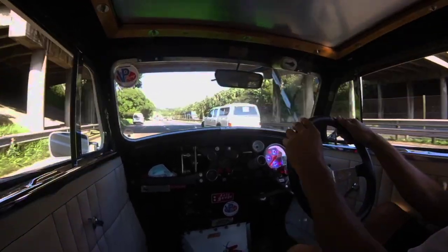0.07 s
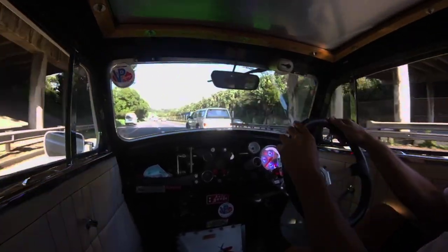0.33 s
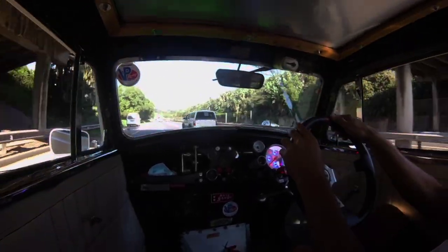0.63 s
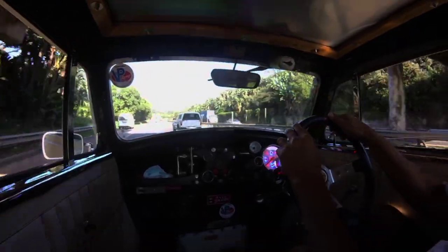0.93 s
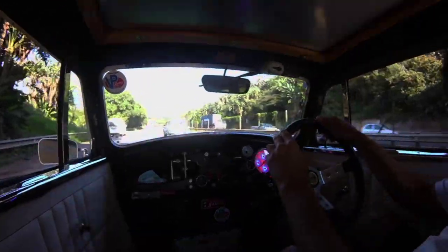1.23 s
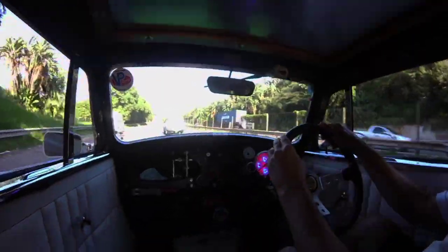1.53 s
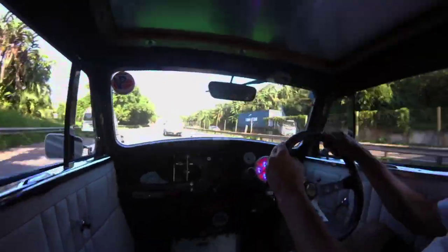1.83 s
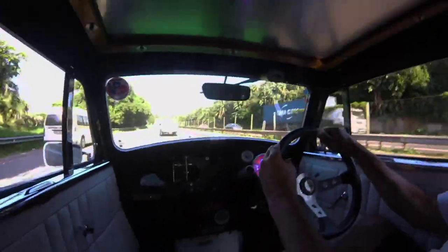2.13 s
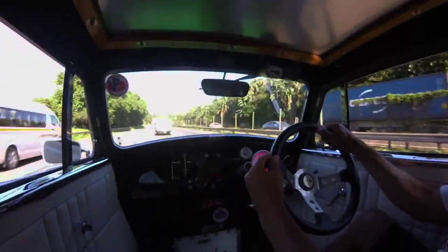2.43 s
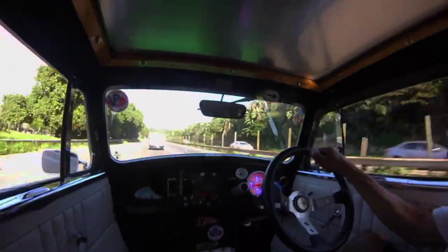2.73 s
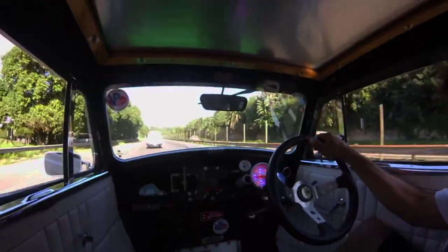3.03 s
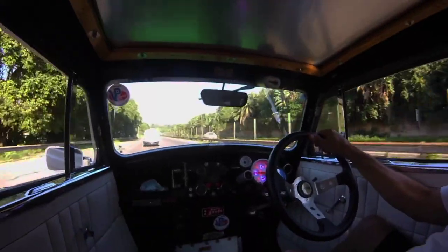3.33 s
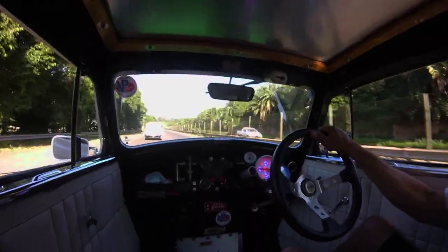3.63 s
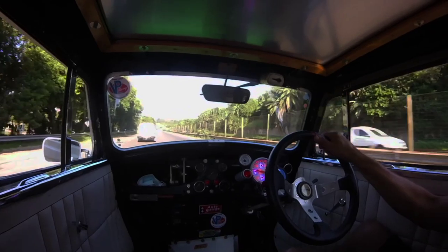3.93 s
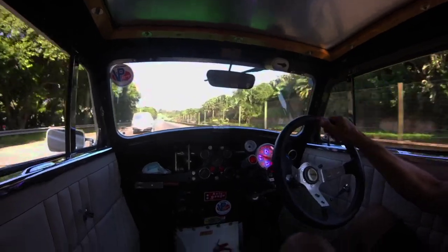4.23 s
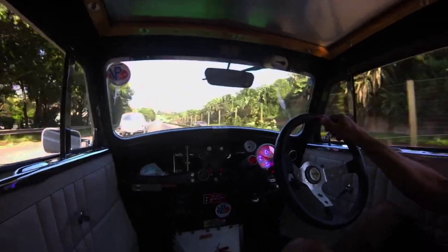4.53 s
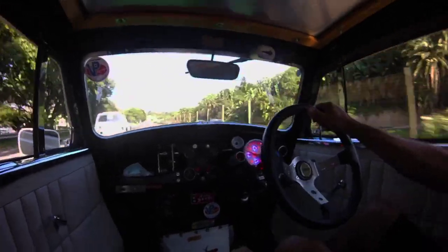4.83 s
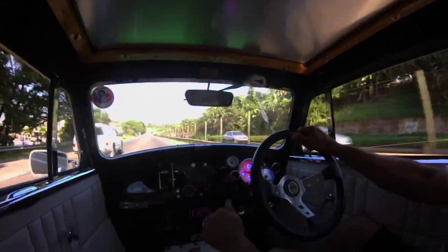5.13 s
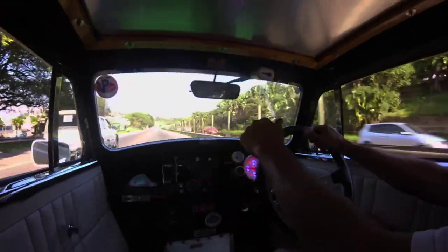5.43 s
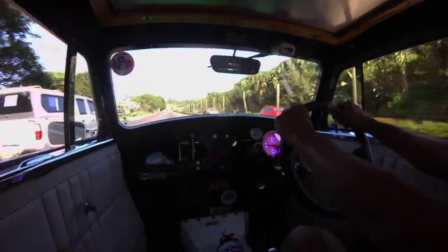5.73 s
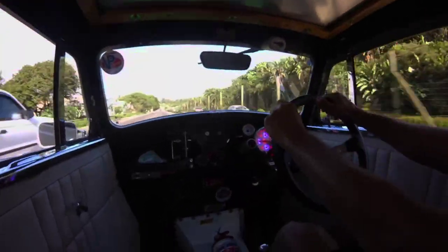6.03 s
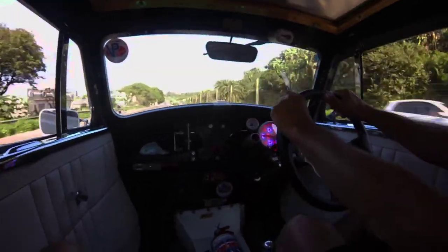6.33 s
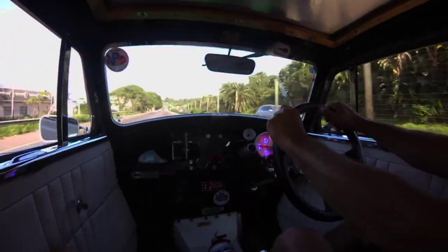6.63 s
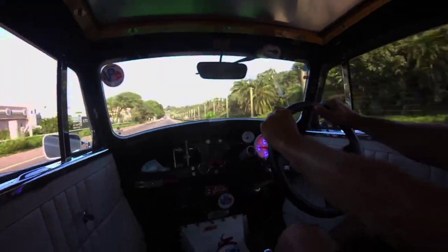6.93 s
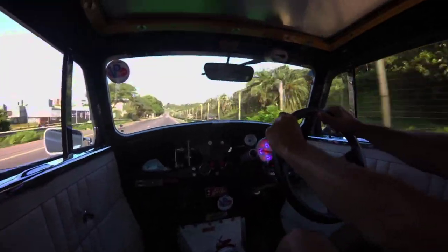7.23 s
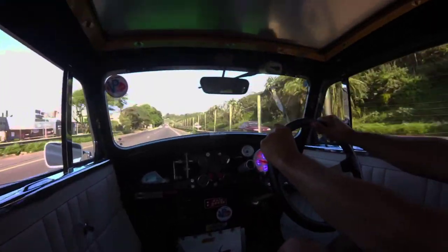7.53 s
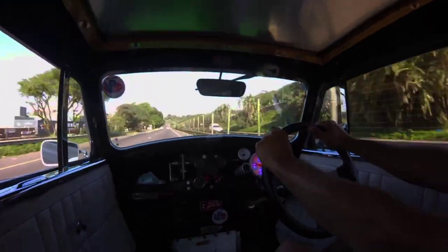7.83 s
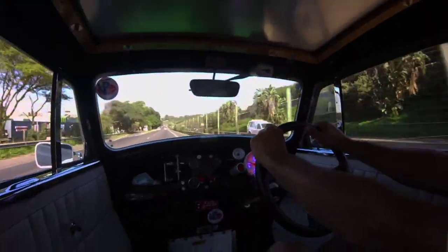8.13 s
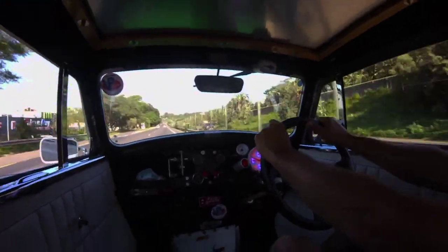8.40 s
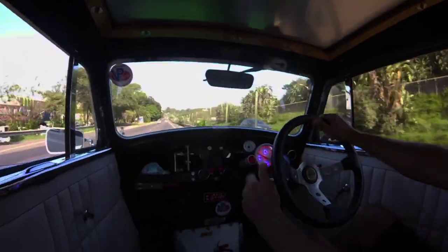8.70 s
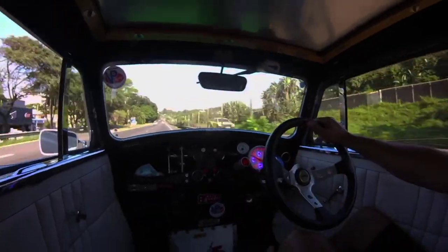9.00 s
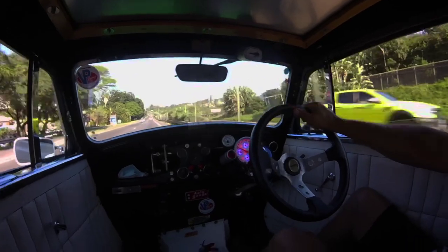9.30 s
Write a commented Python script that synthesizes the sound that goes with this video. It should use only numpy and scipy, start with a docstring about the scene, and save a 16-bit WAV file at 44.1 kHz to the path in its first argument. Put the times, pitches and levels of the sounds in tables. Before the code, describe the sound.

A turbocharged six-cylinder engine accelerates with a rising whistle, shifts gear and pulls again, heard inside the cabin with buffeting wind.

```python
"""A turbocharged straight-six pulls through two gears on a highway, heard inside an old car's cabin.
First the firing note climbs, booming in the cabin's resonances under a turbulent roar, while the
compressor spins up with a hiss and a rising whistle. At 4.5 s the throttle shuts for a shift: boost
escapes in puffs, the exhaust pops and the turbo sags. The second pull runs under heavier wind
buffeting and a growing road rush, until the next shift at 9.3 s."""
import sys
import numpy as np
from scipy import signal
from scipy.fft import rfft, irfft, next_fast_len
from scipy.io import wavfile
from scipy.ndimage import uniform_filter1d

SR = 44100
rng = np.random.default_rng(int(sys.argv[2]) if len(sys.argv) > 2 else 0)


def waveform_to_disk(signal):
    """Save audio, clipped to [-1, 1], as 16-bit WAV at the path in sys.argv[1]."""
    frames = np.transpose(np.atleast_2d(signal))
    scaled = np.clip(frames, -1, 1) * 32767
    samples = np.round(scaled).astype(np.int16)
    wavfile.write(sys.argv[1], SR, samples)


N = 421596
TIME = np.arange(N) / SR
CYLINDERS = 6
THROB = 0.42  # depth of the modulation that comes once in each two-turn engine cycle

# Engine speed. Each row: time in seconds, firing rate in Hz.
FIRING_RATE = [(0, 121.5), (.5, 133.5), (1, 146), (1.3, 154.1), (1.6, 164.8), (2.1, 181.9), (2.5, 199.8),
               (3, 226.1), (3.5, 251.3), (4.25, 291.2), (4.51, 300.8), (4.6, 277.2), (4.76, 259.2),
               (4.95, 252.8), (5.04, 201.8), (5.15, 205.7), (9.2, 295), (9.45, 269.2), (9.56, 280)]
# How hard the engine pulls. Each row: time in seconds, load in dB.
ENGINE_LOAD = [(0, -3), (.7, -3), (.89, -3.5), (.96, -1.1), (3.05, -1.4), (3.3, -0.1), (4.25, 1.4),
               (4.52, 0.5), (4.545, -2.5), (4.62, -6.5), (4.89, -10), (4.94, -3), (5.1, -2.5), (6.55, -4),
               (7.3, -3), (7.6, -2), (8.55, -1), (8.75, -5), (9.27, -4), (9.32, -6.5), (9.56, -4.5)]
# Turbo speed. Each row: time in seconds, whistle frequency in Hz.
TURBO_PITCH = [(0, 3000), (.5, 3320), (1, 4180), (1.5, 5330), (2, 6600), (2.5, 8080), (3.2, 8880),
               (3.8, 9430), (4.53, 10220), (4.68, 7600), (4.79, 5967), (4.905, 5230), (4.99, 6480),
               (5.25, 7700), (5.7, 8288), (6.6, 8900), (7.8, 9390), (9.28, 10020), (9.39, 7700),
               (9.47, 6757), (9.56, 7950)]
# Strength of the buffeting. Each row: time in seconds, relative level in dB.
WIND_STRENGTH = [(0, -35), (2.8, -33.5), (4.2, -23.5), (4.65, -23.5), (6.6, -23.5), (7.6, -22), (9.56, -23)]


def exhaust_note(angle):
    """Periodic firing makes a harmonic series, whose lines swell and fade in the cabin's resonances."""
    # The first five harmonics. Each row: gain in dB, dB per dB of load, flutter depth, flutter rate in Hz.
    harmonics = [(1.5, 1.77, 0.14, 26), (-3.5, 1, 0.14, 13), (-5.5, 1.3, 0.42, 6.3), (-7.5, 2.3, 0.39, 7.1),
                 (-8.5, 2, 0.36, 8)]
    # Cabin response to them. Each row: frequency in Hz, level in dB.
    cabin_response = [(120, -10), (138, -9.5), (152, -17), (200, -16), (222, -12), (265, -19), (292, -32),
                      (365, -33), (420, -25.5), (570, -28), (700, -30.5), (900, -26.5), (1200, -38.5),
                      (1500, -40)]
    # Nulls and peaks of standing waves. Each row: centre in Hz, width in Hz, gain in dB.
    standing_waves = [(249, 12, -8), (299, 13, -6.5), (388.3, 10, -16.5), (479.4, 8.1, -14), (506, 18, 4),
                      (606, 20, -16.5), (636, 28, 6), (644, 24, -4.5), (717, 33, 2.5), (775, 23, -1.5),
                      (819, 23, -9), (852, 13, -7), (913, 14, -14.5), (1024, 61, 4), (1106, 38, -9.5),
                      (1190, 48, 4.5)]
    firing_hz, load_db, shut = curve(FIRING_RATE), curve(ENGINE_LOAD), overrun()
    null_fill = 0.71 * np.minimum(wind_share(), 1)  # wind partly fills the nulls
    note = np.zeros(N)
    for k, (db, per_load, flutter_depth, flutter_hz) in enumerate(harmonics, 1):
        hz = k * firing_hz
        waves_db = resonances_db(standing_waves, hz)
        waves_db -= null_fill * np.minimum(waves_db, 0)
        cabin_db = read(cabin_response, hz) + sweep_db(k * CYLINDERS, hz) + waves_db
        # off throttle the fundamental drones; the rest weaken and scatter in phase
        drone_db = (2.5 if k == 1 else -2.5) * shut
        scatter = (k > 1) * (0.17 * np.log(k) + 1.9 * shut) * wander(50)
        level = amp(db + per_load * load_db + cabin_db + drone_db)
        throb = THROB * min((k - 1) / 3, 1) * np.cos(angle / CYLINDERS)
        note -= level * (1 + flutter_depth * wander(flutter_hz) + throb) * np.cos(k * angle + scatter)
    return np.sqrt(2) * note


def cylinder_orders(angle):
    """Unequal cylinders repeat only every two turns, which adds lines between the firing harmonics."""
    # Lowest orders of the two-turn cycle. Each entry: order, gain in dB.
    low_orders = {2: 0.73, 3: -0.45, 4: -3.5, 5: -0.75, 7: -2.1, 8: -0.31, 9: -2, 10: 1.2, 11: -0.65}
    # Cabin response to the orders. Each row: frequency in Hz, level in dB.
    cabin_response = [(36, -36.5), (50, -23.5), (62, -33), (76, -33), (90, -29.5), (104, -33.5),
                      (125, -47.5), (180, -29), (228, -31.5), (275, -39.5), (325, -58.5), (420, -49),
                      (700, -43.5), (1150, -53.5), (1600, -61.5), (2600, -87)]
    stride = 36  # samples between points of the response
    cycle_hz = curve(FIRING_RATE)[::stride] / CYLINDERS
    uneven_db = engine_db(0, per_load=1.31, per_octave=2.9)
    lines = np.zeros(N)
    for k in range(2, 41):
        if k in (6, 12, 18, 24, 30):  # these belong to the exhaust note
            continue
        # whole crank orders (even k) stand above half orders
        rank_db = low_orders.get(k, 0.5 if k % CYLINDERS == 0 else 1.0 if k % 2 == 0 else -4.5)
        hz = k * cycle_hz
        colour_db = read(cabin_response, hz) + panels_db(hz) + sweep_db(k, hz)
        colour_db = np.interp(TIME, TIME[::stride], colour_db)
        level = amp(colour_db + uneven_db + rank_db + 1.74 * wander(1.8))
        unrest = 0.085 + 0.014 * k  # varying burn strength unsettles the high orders most
        phase = k * angle / CYLINDERS + 2 * np.pi * rng.random()
        lines += level * (1 + unrest * wander(2.2)) * np.cos(phase + unrest * wander(5.8))
    return np.sqrt(2) * lines


def roar(angle):
    """Turbulent gas, amplitude-modulated by the firings, over the boom of vibrating panels."""
    # Spectra of the gas and of the boom. Each row: frequency in Hz, relative density in dB.
    gas_spectrum = [(150, -32.5), (330, 2), (430, -6), (520, -8), (610, 6), (740, 1.5), (1080, 1),
                    (1400, -6), (1700, -16), (2100, -29.5), (3000, -41.5), (6000, -60)]
    boom_spectrum = [(30, -34), (60, 13), (110, 1.5), (170, 4.5), (235, 1.5), (280, -4.5), (325, -35.5),
                     (450, -24.5), (900, -55.5)]
    level = amp(engine_db(-35, per_load=1, per_octave=-0.42) + 2.0 * wander(31)) * (1 + surges())
    puffs = unit(1 + 0.45 * np.cos(angle) + 0.3 * np.cos(angle / 3) + THROB * np.cos(angle / CYLINDERS))
    gas = reflect(noise(gas_spectrum), wet=0.93)
    boom = amp(engine_db(-32, per_load=0.66, per_octave=-4.5)) * noise(boom_spectrum)
    return level * puffs * gas + boom


def burble():
    """One brief, rough downward glide; off throttle, exhaust pops as randomly timed, decaying noise."""
    # Spectrum of the pops. Each row: frequency in Hz, relative density in dB.
    pop_spectrum = [(200, -9), (450, -13), (850, -0.5), (1300, -9), (2200, -28)]
    start_s, start_hz, octaves_per_s = 5.7, 435, 5.1
    pops_per_s, decay_s = 47, 0.0062
    hz = start_hz * 2 ** (-octaves_per_s * np.maximum(TIME - start_s, 0))
    tone = swells([(start_s, 0.098, -43)]) * (0.82 + 0.7 * wander(62)) * np.cos(phase_of(hz))
    burns = (rng.random(N) < pops_per_s / SR) * (1 + rng.random(N))
    decays = signal.lfilter([1], [1, -np.exp(-1 / (decay_s * SR))], burns)
    pops = unit(uniform_filter1d(decays, size=60))  # softened by the body
    return tone + amp(-43) * overrun() * pops * noise(pop_spectrum)


def intake(angle):
    """Flow noise of air entering the compressor, softer and duller while the turbo turns slowly."""
    # Spectrum of the hiss. Each row: frequency in Hz, relative density in dB.
    spectrum = [(900, -12), (1900, 2), (2500, 2.5), (3000, 5.5), (3450, 5), (3850, -1.5), (5000, -2.5),
                (6400, -2), (7400, -7), (9500, -7.5), (11000, -13.5), (13200, -13.5), (15000, -37.5)]
    # Slow swings of the hiss. Each row: time in seconds, gain in dB.
    swings = [(0, -2), (.88, -2), (.97, 0.5), (1.15, -.5), (1.37, 2.5), (1.95, -1.5), (2.22, 1.5),
              (3.05, -2), (3.35, 1), (4.2, -0.5), (4.5, 0.5), (4.9, -1), (5.3, 0), (9.56, 0.5)]
    turbo_hz = curve(TURBO_PITCH)
    spin_db = 3 * np.log2(turbo_hz / turbo_hz.mean())
    level_db = engine_db(-44.5, per_load=0.66, per_octave=2.56) + curve(swings) + spin_db
    level = amp(level_db + 1.27 * wander(30)) * (1 + 0.35 * surges())
    dull = signal.sosfilt(signal.butter(4, 6800, fs=SR, output="sos"), noise(spectrum))
    boost = np.clip((turbo_hz - 3850) / 3300, 0.03, 1)
    rush = reflect(np.sqrt(boost) * noise(spectrum) + np.sqrt(1 - boost) * dull, wet=0.27)
    return level * unit(1 + 0.067 * np.cos(angle)) * rush


def turbo_whistle(angle):
    """The compressor's tone, with noisy sidebands, flares as it sweeps through the duct's resonances."""
    # Intake resonances and nulls. Each row: centre in Hz, width in Hz, gain in dB.
    duct = [(3000, 260, -12.5), (3360, 110, 5.5), (4100, 700, 6.5), (4897, 400, 7.5), (5750, 500, 3),
            (7250, 180, 6.5), (8440, 1000, 8), (8650, 190, -12), (9100, 670, 4), (9410, 89, 4),
            (10000, 500, 1)]
    # The whistle breaks off as each dump begins. Each row: time in seconds, base level in dB.
    envelope = [(0, -66.5), (1.5, -59.5), (2, -62.5), (2.5, -59.5), (3.3, -58), (4.52, -60), (4.55, -74),
                (4.64, -68), (4.7, -60), (5.2, -59.5), (7.8, -59), (8.6, -66), (9.27, -64), (9.3, -70),
                (9.35, -70), (9.39, -60), (9.56, -66)]
    hz = uniform_filter1d(curve(TURBO_PITCH), size=3500)  # rotor inertia smooths each change
    level_db = curve(envelope) + 0.13 * curve(ENGINE_LOAD) + resonances_db(duct, hz)
    phase = phase_of(hz * (1 + 0.0024 * wander(37)))
    sidebands = wander(220) * np.cos(phase) + wander(220) * np.sin(phase)
    firing_pulse = 1 + 0.29 * np.cos(angle)
    return amp(level_db + 4 * wander(23)) * firing_pulse * (np.cos(phase) + 0.55 * sidebands)


def dump_valve():
    """Jet noise: boost escapes in ragged puffs that rise fast and tail off, duller as pressure falls."""
    # Puffs. Each row: start in seconds, length in seconds, level in dB, tilt in dB per band.
    puffs = [(4.52, 0.092, -48, 3), (4.602, 0.11, -42.5, 0.5), (4.675, 0.13, -46.5, 0),
             (4.731, 0.1, -46.5, -3.5), (9.308, 0.084, -47, 0), (9.368, .07, -44, -1.5),
             (9.412, 0.056, -48, 0)]
    # Spectrum of the jet. Each row: frequency in Hz, relative density in dB.
    spectrum = [(1500, -17), (3300, 3), (6000, -4), (9500, -2.5), (12000, -10), (15000, -4)]
    # Bands that flutter independently. Each row: lower edge in Hz, upper edge in Hz.
    bands = [(1500, 4500), (4500, 8000), (8000, 11500), (11500, 15000)]
    air, jet = noise(spectrum), np.zeros(N)
    for step, band in enumerate(bands):
        hiss = signal.sosfilt(signal.butter(3, band, "bandpass", fs=SR, output="sos"), air)
        envelope = sum(amp(db + step * tilt_db) * np.interp((TIME - s) / length, [0, 0.31, 1], [0, 1, 0])
                       for s, length, db, tilt_db in puffs)
        jet += envelope * hiss * unit(amp(4.2 * wander(50)))
    return jet


def wind():
    """Vortex shedding: eddies throb at the open window, with a few heavier thuds of body and wind."""
    # Spectrum of the eddies. Each row: frequency in Hz, relative density in dB.
    spectrum = [(5, -35.5), (14, 14), (24, 0.5), (36, 6), (50, -7.5), (70, -19.5), (110, -22.5), (200, -55),
                (500, -71)]
    # Thuds. Each row: start in seconds, length in seconds, level in dB.
    thuds = [(4.54, 0.079, -18.5), (4.74, 0.072, -19), (4.88, 0.087, -19.5), (8.81, 0.061, -23),
             (9.17, 0.12, -20), (9.39, 0.12, -18)]
    eddies = noise(spectrum)
    eddies /= np.sqrt(uniform_filter1d(eddies ** 2, size=5000) + 0.029)  # evens out the train
    rumble = noise([(30, -1.5), (60, 0.5), (130, -8.0), (240, -14.0), (380, -27.5), (800, -21.5)])
    return amp(curve(WIND_STRENGTH) + 6.5) * eddies + swells(thuds) * rumble


def road():
    """Broadband noise of tyres and air flow grows as the car gains speed."""
    # Spectrum of the rush. Each row: frequency in Hz, relative density in dB.
    spectrum = [(100, -9), (200, -3.5), (340, 0), (480, -4), (750, -3.5), (930, 0.5), (1150, 1.5),
                (1400, -7), (1900, -18.5), (3200, -32), (4200, -39.5), (6400, -26.5), (7400, -25)]
    return amp(-42 + 0.43 * TIME) * noise(spectrum)


def surges():
    """Amplitude modulation: extra gain that briefly swells the roar and hiss under strain."""
    # Surges. Each row: start in seconds, length in seconds, size of the added gain in dB.
    bursts = [(.95, 0.11, -11), (3.153, 0.025, -8), (3.19, 0.25, -6), (3.79, 0.13, -0.5), (4.31, 0.079, 2),
              (4.46, 0.072, 4), (4.91, 0.043, -6), (5.93, 0.068, 6), (7.34, 0.08, -4), (7.52, 0.077, 2),
              (7.76, 0.075, -4), (8.1, 0.19, -5), (8.33, 0.21, -12), (9.17, 0.077, 7.5)]
    return swells(bursts)


def dips():
    """A gain envelope that drops at once and climbs back; it also sinks and wavers in stronger wind."""
    # Brief dips. Each row: start in seconds, depth in dB, recovery in seconds.
    drops = [(5.03, 7, 0.2), (5.56, 4, 0.1), (6.1, 4, 0.16), (6.408, 4.5, 0.15), (6.562, 5.5, 0.1),
             (7.171, 5, 0.084), (7.25, 6.5, 0.1), (7.841, 4, 0.2), (7.99, 6, 0.12), (8.564, 9.5, 0.11),
             (8.721, 11.5, 0.037), (8.84, 4, 0.18), (8.911, 9, 0.026), (8.952, 13, 0.042),
             (9.287, 10, 0.035), (9.441, 11, 0.069), (9.52, 9, .05)]
    drop_db = sum(db * (TIME > s) * np.clip(1 - (TIME - s) / recovery, 0, 1) for s, db, recovery in drops)
    waver_db = wind_share() * (1.4 * wander(6.1) - 1)
    return uniform_filter1d(amp(waver_db - drop_db), size=170)


def sweep_db(order, hz):
    """Resonance in pipe and cabin lifts or cuts one order as its frequency sweeps past."""
    # Flat-topped peaks and nulls. Each row: order, centre in Hz, width in Hz, gain in dB.
    peaks = [(2, 98, 6.4, 4.5), (4, 182, 31, -4), (5, 201.2, 12, 6.5), (5, 218, 9.5, -12),
             (5, 244, 19, 2.5), (7, 228.7, 35, 10.5), (9, 233, 35, 14), (9, 444, 20, 6), (12, 440, 89, 1.5),
             (12, 479, 19, -1.5), (18, 692, 17, -7.5), (18, 730, 34, 2.5), (18, 895, 26, 0),
             (24, 830, 120, 3), (24, 990, 100, 3), (24, 1500, 26, -9), (30, 920, 230, -6.5),
             (30, 1195, 110, 3.5), (36, 880, 230, -5.5), (38, 1200, 200, -6.5)]
    return sum(db / (1 + abs(2 * (hz - centre) / width) ** 6)
               for k, centre, width, db in peaks if k == order)


def panels_db(hz):
    """Modes of the panels and glass lift or cut these frequencies."""
    # Resonances and nulls. Each row: centre in Hz, width in Hz, gain in dB.
    modes = [(467, 110, 5.5), (474, 7.8, -5), (581, 38, -7), (716, 91, 1.5), (818, 54, 5.5), (980, 42, 5),
             (1125, 14, 2.5), (1169, 27, 5), (1230, 39, -3), (1328, 46, 9), (1678, 34, 6.5),
             (1902, 35, 6.5)]
    return resonances_db(modes, hz)


def resonances_db(rows, hz):
    """Each resonance adds a Lorentzian peak or notch, in dB."""
    return sum(db / (1 + (2 * (hz - centre) / width) ** 2) for centre, width, db in rows)


def reflect(x, wet, size=700):
    """Early reflections off glass and roof interfere with the direct sound and ripple its spectrum."""
    taps = rng.standard_normal(size) * (rng.random(size) < 0.06) * np.linspace(1, 0, size)
    response = np.r_[1, np.zeros(50), wet * taps / np.linalg.norm(taps)]
    return signal.oaconvolve(x, response / np.linalg.norm(response))[:N]


def engine_db(db, per_load, per_octave):
    """A power law: level in dB, with slopes per dB of load and per octave of firing rate from 200 Hz."""
    return db + per_load * curve(ENGINE_LOAD) + per_octave * np.log2(curve(FIRING_RATE) / 200)


def overrun():
    """Throttle closure: 0 while the engine pulls, 1 once the load is down to -6.5 dB."""
    return np.clip((-4.5 - curve(ENGINE_LOAD)) / 2, 0, 1)


def wind_share():
    """Amplitude ratio of the wind to a full wind of -20 dB."""
    return amp(curve(WIND_STRENGTH) + 20)


def noise(spectrum):
    """White noise shaped by a spectrum and the panel modes, rolled off at the last point; rms 1."""
    size = next_fast_len(N)
    hz = np.fft.rfftfreq(size, 1 / SR)
    gain = amp(read(spectrum, hz) + panels_db(hz)) / (1 + (hz / spectrum[-1][0]) ** 4)
    return unit(irfft(rfft(rng.standard_normal(size)) * gain, size)[:N])


def wander(rate_hz, size=8192):
    """Low-passed noise of rms 1: random drift up to about the given rate."""
    hz = np.arange(size // 2 + 1) * SR / N
    slow = irfft(rfft(rng.standard_normal(size)) / (1 + (hz / rate_hz) ** 2))
    return unit(np.interp(TIME, np.linspace(0, N / SR, size), slow))


def swells(rows):
    """Envelope of short bursts, each half an ellipse."""
    return sum(amp(db) * np.sqrt(np.maximum(1 - (2 * (TIME - s) / length - 1) ** 2, 0))
               for s, length, db in rows)


def phase_of(hz):
    """Phase in radians is the integral of frequency."""
    return 2 * np.pi * np.cumsum(hz) / SR


def curve(rows):
    """Linear interpolation of a table in time."""
    return np.interp(TIME, *np.transpose(rows))


def read(spectrum, hz):
    """A spectrum's dB, interpolated on a log-frequency axis."""
    points_hz, db = np.transpose(spectrum)
    return np.interp(np.log(hz + 1), np.log(points_hz + 1), db)


def amp(db):
    """Decibels to amplitude ratio."""
    return 10 ** (np.asarray(db) / 20)


def unit(x):
    """Normalises to rms 1."""
    return x / np.sqrt(np.mean(x ** 2) + 1e-20)


def scene():
    """Superposition in the cabin; one firing phase keeps the engine's layers in step."""
    angle = phase_of(curve(FIRING_RATE)) + 0.008 * wander(25)  # the crank never turns quite evenly
    engine = exhaust_note(angle) + cylinder_orders(angle) + roar(angle) + burble()
    car = engine + intake(angle) + turbo_whistle(angle) + dump_valve() + road()
    return (car * dips() + wind())[None]


def record(dry):
    """Peak limiting ducks everything on the highest peaks; a low-pass filter then limits the band."""
    threshold_db, release_db_per_s, cutoff_hz = -6.5, 60, 14800
    release_db = release_db_per_s * TIME
    peak_db = 20 * np.log10(abs(dry[0]) + 1e-9)
    held_db = np.maximum.accumulate(peak_db + release_db) - release_db
    over_db = np.maximum(held_db - threshold_db, 0)
    limited = dry / amp(uniform_filter1d(over_db, size=120))
    low_pass = signal.firwin(255, cutoff_hz, window=("kaiser", 9), fs=SR)
    fade_in = np.minimum(TIME / 0.004, 1)
    return signal.oaconvolve(limited * fade_in, low_pass[None], "same")


dry = scene()
out = record(dry)
waveform_to_disk(out)
```